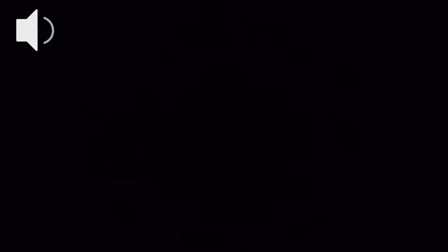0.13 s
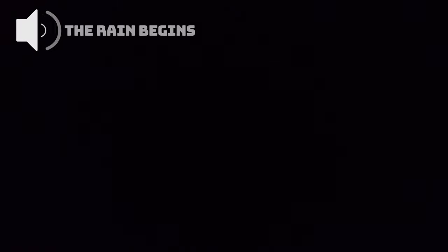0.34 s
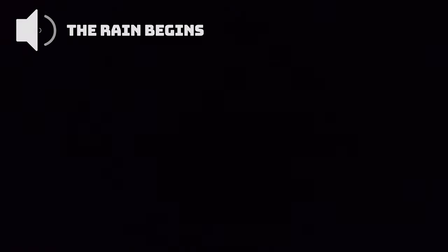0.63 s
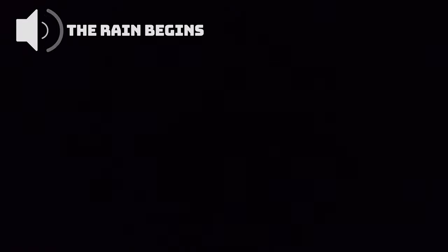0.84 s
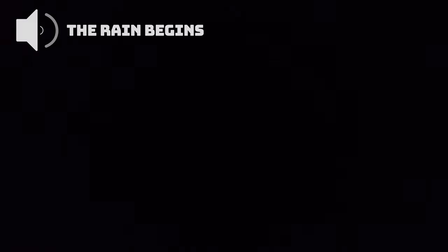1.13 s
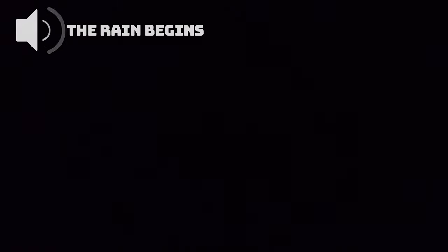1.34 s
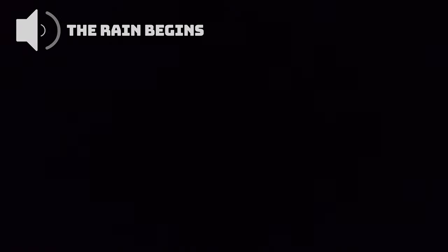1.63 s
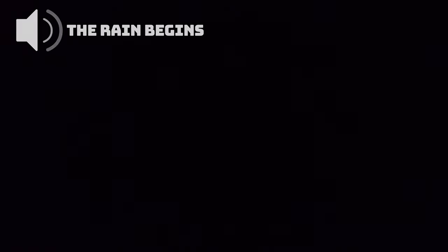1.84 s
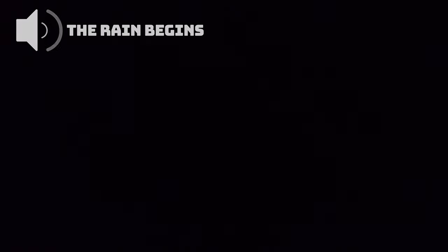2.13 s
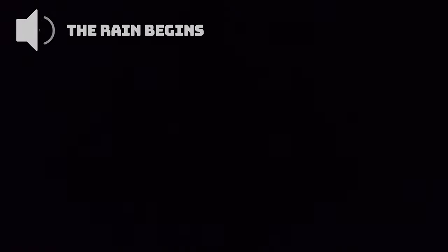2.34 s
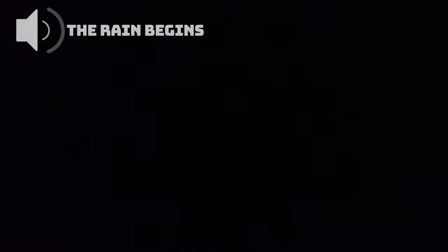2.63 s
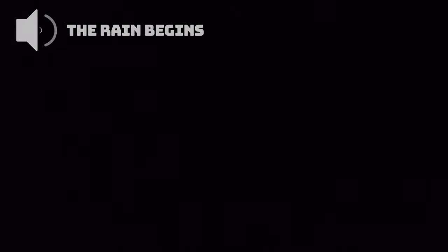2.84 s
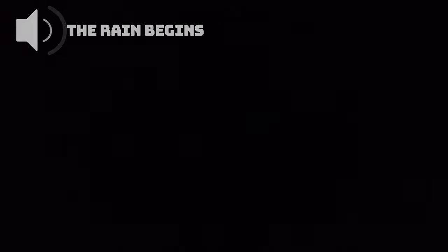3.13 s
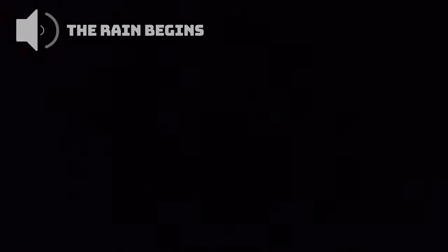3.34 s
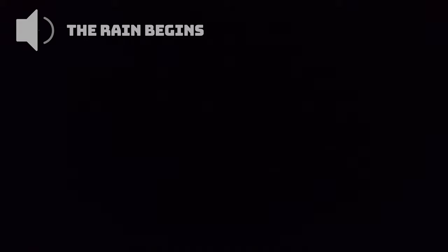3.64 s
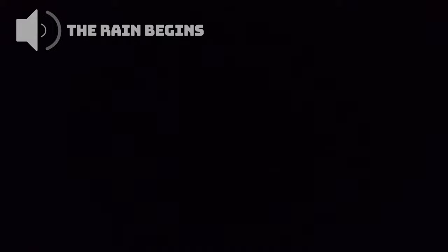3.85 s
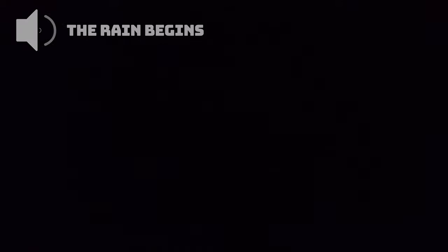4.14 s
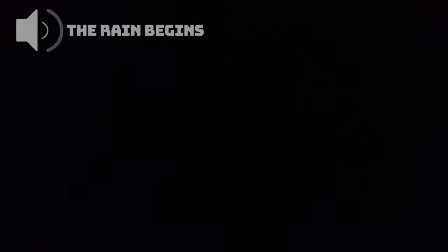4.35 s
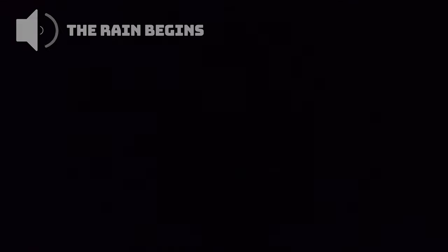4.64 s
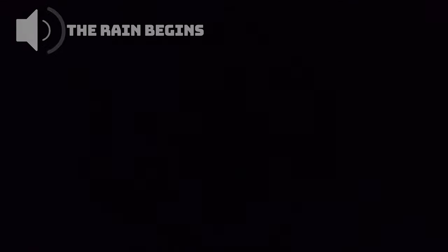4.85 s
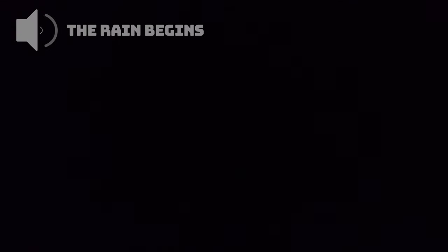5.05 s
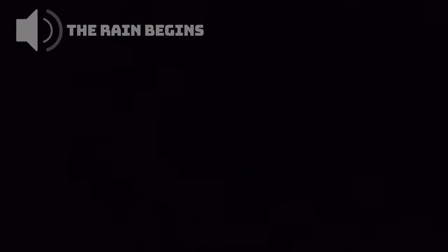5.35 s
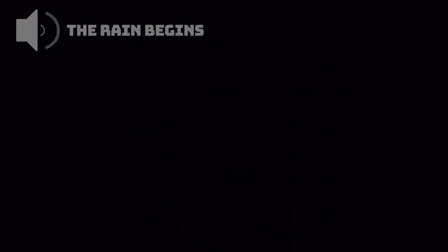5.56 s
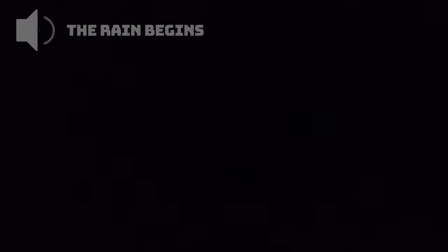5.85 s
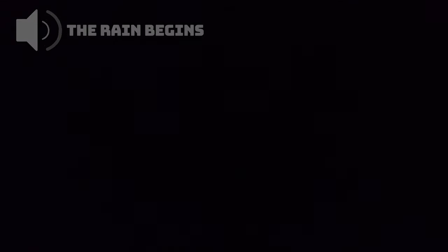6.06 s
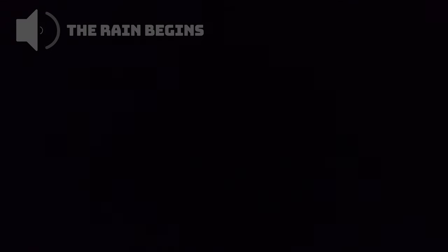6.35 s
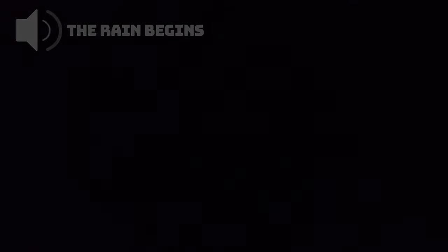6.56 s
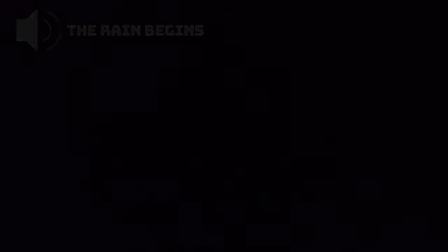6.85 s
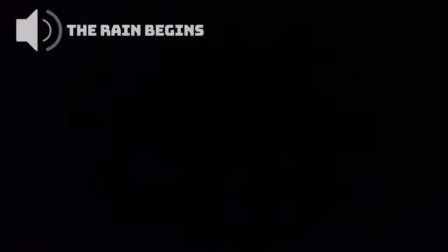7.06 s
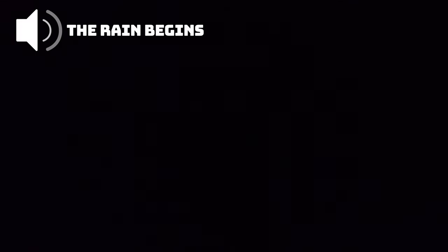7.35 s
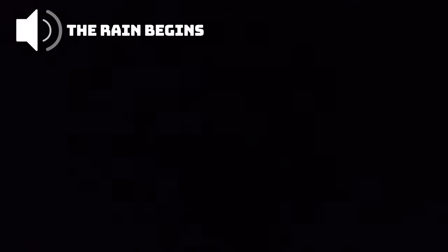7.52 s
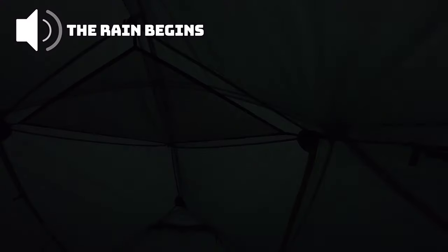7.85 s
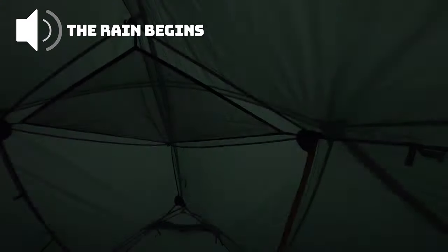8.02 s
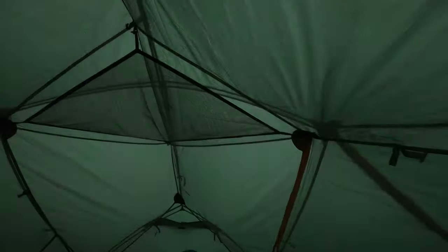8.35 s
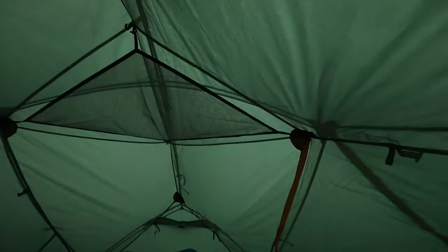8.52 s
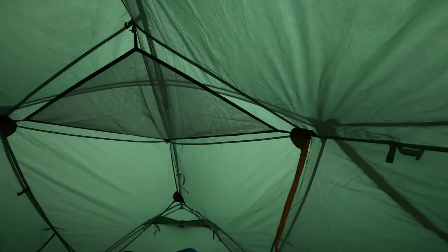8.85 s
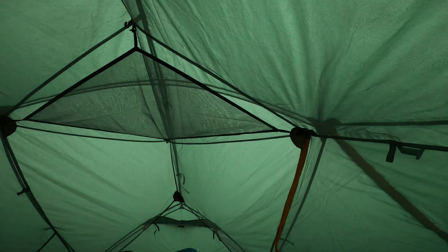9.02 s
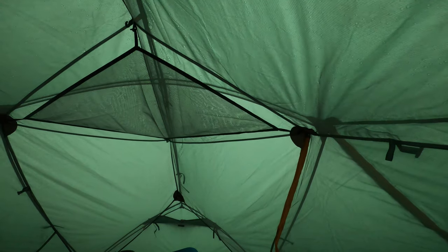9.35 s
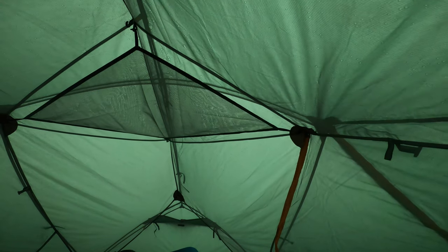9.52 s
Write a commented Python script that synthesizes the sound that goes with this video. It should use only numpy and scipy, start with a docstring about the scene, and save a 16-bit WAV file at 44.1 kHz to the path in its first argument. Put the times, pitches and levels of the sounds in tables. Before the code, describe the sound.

From 0 to about 7.8 s, light rain falls on a taut tent fly, heard close from inside in wide stereo. Hundreds of fine, dry ticks a second blend over a soft mid-to-high hiss, wandering gently in strength. Larger drops stand out irregularly, several each second, as crisp snaps or compact plops, notably near 0.7, 1.1, 2.4 and 3.7 s, with short cloth shiver and small, dry echoes. Underneath, panels murmur faintly, swelling near 5.2 and 5.9 s; a slack panel gives a dull low flap around 5.0 and 5.25 s. Brief low wind buffets bump near 0.4 and 1.4 s and cluster from 7.3 to 8.5 s. From 7.8 s heavy rain fades in quickly while the light rain fades out by about 9 s. It is louder, denser, duller and nearly mono: fat, round pats overhead over a low wash, surging until the end at about 9.7 s.

```python
"""Inside a tent in the rain, in two scenes. Fine drops tick on the taut fly all around; near eight seconds
this light-rain scene fades out while a heavier, duller, nearly mono rain scene fades in.
Each drop is a sharp push on the cloth with a brief shiver and echoes; crowds of drops and filtered
noise make the rain. The fabric drums softly (noise with moving resonances), a slack panel
flaps now and then (short low swings), and wind buffets the microphones (low noise in gusts)."""
import sys
import numpy as np
from scipy import signal
from scipy.fft import rfft, irfft, next_fast_len
from scipy.io import wavfile
from scipy.ndimage import uniform_filter1d

SR = 44100
rng = np.random.default_rng(int(sys.argv[2]) if len(sys.argv) > 2 else 0)


def int16_out(signal):
    """Quantize to a 16-bit WAV file."""
    q = np.round(np.clip(np.atleast_2d(signal).T, -1, 1) * 32767)
    wavfile.write(sys.argv[1], SR, q.astype(np.int16))


N = 426888
TIME = np.arange(N) / SR  # seconds
DROP_SIZE = 4096  # samples in one drop
EDGE_HZ = 15200  # top of the band that is heard
DROPLET_FLIGHT_S = .02  # longest flight of the droplets that a big drop throws up
BREEZE_DB = -70.5  # the breeze between gusts, on the same scale as the gusts
# the light-rain scene (rain and drumming) holds this gain, then fades out ever faster
SHOWER_GAIN_DB, SHOWER_ENDS_S, SHOWER_SINK_DB_PER_S2 = 5, 8.05, 32

# Levels in these tables are relative: the functions that use them may add a gain.
# strength of the light rain as it comes in waves: (time [s], level [dB])
LIGHT_RAIN_LEVEL = [(0, -51), (.1, -50), (.25, -53.5), (.6, -53), (.8, -54), (1.1, -54.5), (1.45, -54),
                    (1.78, -50.5), (2.1, -52), (2.55, -52), (2.75, -52.5), (3.45, -50.5), (3.6, -54.5),
                    (3.76, -49), (3.9, -54.5), (4.26, -53), (4.31, -57.5), (4.37, -59.5), (4.385, -53.5),
                    (4.5, -56.5), (4.7, -51), (4.85, -53), (4.96, -49.5), (5.08, -56), (5.14, -51),
                    (5.36, -50.5), (5.55, -55), (5.8, -52), (6.4, -50.5), (6.9, -53.5), (7.35, -51.5),
                    (7.6, -56.5), (7.8, -54.5)]
# the biggest drops in the light rain: (time [s], level of the first 3 ms [dB], pitch of the splat [Hz],
# prominence of that pitch [dB], its width [octaves], left minus right near 2500 Hz [dB])
BIG_LIGHT_DROPS = [(0.0098, -38, 3400, 13, 0.92, 0.5), (0.0881, -38.5, 1780.0, 7, 0.38, -2),
                   (0.2348, -41.5, 3200.0, 8, 0.32, 3), (0.5707, -43, 2900.0, 2, 0.93, 1),
                   (0.7115, -33.5, 1700, 13, 0.97, 0), (0.7323, -40, 3200.0, 9, 0.25, -1),
                   (0.7448, -43.5, 4440, 22, 0.65, 0), (1.1131, -31, 2180, 11, 0.5, -3.5),
                   (1.3473, -39.5, 7040, 4, 0.25, 2.5), (1.3716, -45, 3040.0, 10, 0.25, -4),
                   (1.451, -40.5, 4730.0, 11, 0.65, -0.5), (1.568, -40, 1390.0, 9, 0.54, -1),
                   (1.594, -38, 2900.0, 1, 0.25, 2), (1.633, -48, 4500.0, 5.5, 0.25, -3),
                   (1.6735, -43, 4470, 4, 0.71, 0), (1.699, -41, 2060.0, 9, 0.5, 1),
                   (1.7467, -37, 3530.0, 10, 0.5, 3), (1.7538, -40, 2900.0, 6, 0.25, -5),
                   (1.8623, -46, 2900.0, 7, 1, 3), (1.9029, -44, 3360.0, 3, 0.72, 1),
                   (1.9138, -41.0, 1380, 21, 0.85, -2), (1.9365, -42.5, 1960.0, 13, 0.28, -1),
                   (1.9468, -39, 1610.0, 7, 0.74, -2), (1.9992, -36.5, 2610, 11, 0.25, -1),
                   (2.0133, -42, 2500.0, 5, 0.85, 1), (2.049, -40.5, 1040.0, 5, 0.4, 0),
                   (2.1203, -41, 1190, 15, 0.79, -1), (2.269, -50, 2500.0, 9, 0.85, -4),
                   (2.282, -39, 2900.0, 4, 0.5, -1), (2.3828, -37, 2380.0, 7, 0.25, 0),
                   (2.409, -31, 5260, 14, 0.43, 2), (2.4721, -38.5, 2270.0, 3, 0.31, -2),
                   (2.5744, -41.5, 3700.0, 3, 0.25, -1), (2.5972, -40, 5800, 2, 0.25, -2),
                   (2.6506, -38.5, 2270.0, 4, 0.5, 0), (2.672, -39, 940.0, 5, 0.28, -1),
                   (2.6926, -39.0, 2720, 17, 0.39, 2), (2.761, -35.5, 5480.0, 3, 0.25, 0),
                   (2.7917, -41.5, 1040.0, 10, 0.83, 2), (2.8986, -41.0, 2510, 13, 0.65, -1),
                   (2.9279, -40.0, 3360.0, 12, 0.85, 11), (3.0972, -40.5, 2630.0, 11, 0.99, 0),
                   (3.1122, -39, 3040.0, 13, 0.94, 2), (3.1268, -39.5, 6350.0, 6, 0.83, -1),
                   (3.1537, -36, 3930, 18, 1, -1), (3.1953, -37.5, 3680, 12, 0.65, -3),
                   (3.2526, -44, 1080, 11, 0.85, -1), (3.2779, -43, 1320.0, 16, 0.81, 0),
                   (3.299, -45, 890.0, 13, 0.98, -4), (3.3114, -48, 1390.0, 8, 0.5, -2),
                   (3.3858, -34.0, 2600, 10, 0.25, 3), (3.6205, -41.0, 3020, 7, 0.25, -1),
                   (3.6857, -42.0, 3530.0, 15, 0.5, 2), (3.6934, -32, 2530, 9, 0.25, -4),
                   (3.715, -47, 4080.0, 16, 0.85, -4), (3.7588, -40, 1390.0, 6, 0.85, -2),
                   (3.7744, -37.5, 5170, 8, 0.39, -2), (3.8036, -41, 1320.0, 11, 0.65, 2),
                   (3.8778, -44, 4290.0, 0, 0.25, -2), (3.9814, -38, 1330, 4, 0.22, -2.5),
                   (4.0855, -39, 3360.0, 13, 0.94, -1), (4.1288, -42.5, 3890.0, 3, 1, 2),
                   (4.4368, -45, 810.0, 5, 0.65, 1), (4.5115, -39.5, 3200.0, 3, 0.22, -1),
                   (4.5589, -41, 6350.0, 2, 0.5, -1), (4.6254, -42.0, 890.0, 9, 0.72, -2),
                   (4.6637, -41, 760, 12, 0.65, -2), (4.6718, -33.5, 3200.0, 3, 0.85, -1),
                   (4.725, -40.5, 2370, 4, 0.25, -3), (4.9566, -37.5, 2500.0, 6, 0.2, -2),
                   (5.011, -39, 1530.0, 4, 0.5, 13), (5.1192, -42, 2900.0, 10, 0.85, -1),
                   (5.1335, -34, 4080.0, 5, 0.99, -2), (5.2341, -40.5, 5220.0, 3, 0.25, -3),
                   (5.2533, -46, 7000.0, 8, 0.5, 2), (5.3142, -36.0, 850.0, 1, 0.65, -3),
                   (5.3864, -37.5, 4730.0, 7, 0.75, -2), (5.4375, -41, 2630.0, 7, 0.25, 6),
                   (5.5086, -41, 4970.0, 13, 0.36, -1), (5.553, -37, 2060.0, 6, 0.27, -1),
                   (5.597, -42.5, 6040.0, 8, 0.25, -2), (5.6194, -38.5, 4970.0, 5, 1, -3),
                   (5.687, -44, 4060, 9, 0.33, -3), (5.7385, -41.5, 4080.0, 7, 0.25, 0),
                   (5.7432, -38, 3040.0, 4, 0.35, 2), (5.7521, -39, 4290.0, 1, 0.65, -1),
                   (5.7797, -41.5, 3040.0, 7, 0.25, 0), (5.8639, -43, 990.0, 8, 1, -4),
                   (5.8811, -45, 2270.0, 11, 0.25, 2), (5.9423, -41, 1780.0, 6, 0.35, 0),
                   (6.0074, -44.5, 1610.0, 12, 0.43, 2), (6.0404, -40.5, 4260, 14, 0.98, -5),
                   (6.1156, -36.5, 1530.0, 8, 0.45, 0), (6.2226, -42, 4730.0, 15, 0.65, -4),
                   (6.2826, -39, 1960.0, 7, 0.25, -4), (6.3385, -40.0, 2900.0, 16, 1, 0),
                   (6.3855, -36.5, 2900.0, 4, 0.21, -3), (6.4265, -42, 3890.0, 7, 0.25, 1),
                   (6.4574, -38, 1380, 10, 0.98, 5), (6.4678, -37, 4000, 9, 0.4, -2),
                   (6.811, -36.5, 4290.0, 7, 0.97, 3), (6.8212, -41.5, 1690.0, 11, 0.65, -7),
                   (6.9225, -45, 1960.0, 2, 0.25, 0), (7.081, -42.5, 1040.0, 13, 1, 0),
                   (7.1477, -40, 3000, 8, 0.25, 0), (7.272, -38, 1260.0, 10, 0.85, -2),
                   (7.3195, -36, 940.0, 6, 0.45, -2), (7.3336, -37.5, 1530.0, 8, 1, 0),
                   (7.3758, -42, 1860.0, 10, 0.93, -1), (7.3996, -38.5, 3700.0, 2, 0.25, -2.5),
                   (7.6523, -40, 2080, 7, 0.69, 1), (7.7382, -42.5, 2900.0, 7, 0.23, -3)]
# colour of the fly under fine drops: (frequency [Hz], level [dB])
FINE_DROP_COLOUR = [(60, -41), (200, -14), (420, -12), (600, -8.5), (880, -8.5), (1050, -1), (2000, 0.5),
                    (3200, -0.14), (4500, -6.5), (7400, -12.5), (8500, -19), (12300, -28.5), (14500, -54)]
# balance of the two microphones in the light rain: (frequency [Hz], left minus right [dB])
MICROPHONE_BALANCE = [(300, -5), (1200, -0.6), (2500, 0.9), (4100, 1.5), (6000, -3), (7600, -7),
                      (8700, -1.5), (14000, -2)]
# strength of the heavy rain as its scene fades in and the rain surges: (time [s], level [dB])
HEAVY_RAIN_LEVEL = [(7.78, -72), (7.88, -54), (7.97, -52), (8.06, -46), (8.17, -46), (8.24, -45),
                    (8.42, -42.5), (8.55, -44.5), (8.7, -41.5), (8.83, -46.5), (8.96, -43), (9.14, -45.5),
                    (9.24, -43.5), (9.35, -44.5), (9.48, -44), (9.68, -46.5)]
# the biggest drops in the heavy rain: (time [s], level of the first 3 ms [dB], pitch of the splat [Hz],
# prominence of that pitch [dB])
BIG_HEAVY_DROPS = [(8.0564, -37, 1090.0, 4), (8.1505, -43, 810.0, 11), (8.215, -34.5, 710, 8),
                   (8.2293, -35.5, 3380, 13), (8.2446, -36, 2630.0, 6), (8.2763, -37.5, 700.0, 2),
                   (8.3213, -42, 990.0, 9), (8.343, -43, 990.0, 6), (8.423, -33, 1320.0, 16),
                   (8.4424, -40, 1460.0, 6), (8.4885, -44, 2500.0, 4), (8.5273, -34.5, 3530.0, 4),
                   (8.5536, -36, 1180, 10), (8.5972, -37, 1200.0, 13), (8.6338, -37.5, 1390.0, 8),
                   (8.6577, -46, 2160.0, 13), (8.6845, -36.0, 1460.0, 12), (8.6967, -38, 700.0, 7),
                   (8.72, -41.0, 810.0, 15), (8.7593, -37, 1320.0, 14), (8.7957, -41.5, 1320.0, 8),
                   (8.8119, -40, 850.0, 13), (8.8678, -44, 700.0, 7), (8.883, -35.5, 3700.0, 7),
                   (8.9486, -35, 2150, 12), (8.9716, -37.5, 1960.0, 10), (8.9853, -36, 1040.0, 6),
                   (9.0116, -37, 3390, 6), (9.0295, -33, 700.0, 8), (9.0787, -35, 1040.0, 4),
                   (9.1101, -36.5, 990.0, -1), (9.1375, -37, 700.0, 2), (9.1657, -33.5, 700.0, 4),
                   (9.1806, -31.5, 940.0, 1), (9.1942, -38, 1140.0, 3), (9.209, -41, 850.0, -6),
                   (9.2365, -31, 1080, 8), (9.2628, -39.5, 5220.0, 9), (9.299, -38, 740.0, 13),
                   (9.4007, -38.5, 3200.0, 8), (9.4312, -40.5, 1460.0, 9), (9.4635, -33.5, 1390.0, 7),
                   (9.5007, -37, 820, 13), (9.5169, -39, 740.0, 2), (9.5627, -37, 704, 10),
                   (9.588, -40, 815, 13), (9.5995, -40, 1690.0, 3), (9.655, -43, 3040.0, 3)]
# colour of the fly under heavy drops: (frequency [Hz], level [dB])
HEAVY_DROP_COLOUR = [(30, -21), (100, -33.5), (160, -10.5), (330, -6), (520, -12), (800, -6), (1100, -2.7),
                     (1350, -3), (2200, -10.5), (3100, -9), (5000, -17.5), (8000, -25), (10000, -26),
                     (14500, -41)]
# drumming of the fabric: (time [s], lower resonances [dB], upper resonances [dB])
DRUMMING_LEVEL = [(0.0, -78, -81), (0.04, -72, -73), (0.46, -80, -80), (0.63, -71.5, -73.5),
                  (1.87, -64, -70), (1.93, -74.5, -71.5), (2.52, -74, -69.5), (2.78, -69, -74),
                  (3.13, -71, -76), (3.67, -70, -70), (4.17, -73.5, -71.5), (5.24, -62.5, -70),
                  (5.65, -72, -76), (5.84, -69, -67), (5.89, -62, -69.5), (6.6, -73, -75),
                  (6.69, -61.5, -75), (6.78, -71.5, -77), (7.49, -72, -74.5), (7.67, -86, -80),
                  (7.71, -73, -68), (7.8, -75, -74)]
# colour of the drumming: (frequency [Hz], level [dB])
DRUMMING_COLOUR = [(30, -6), (65, -10), (100, -20.5), (122, -17.5), (150, -0.5), (190, -3.5), (240, -3.5),
                   (320, -3.5), (430, -12), (800, -22.5), (3000, -73)]
# soft flaps of the slack fly: (time of the middle [s], peak [dB], pitch [Hz], half length [s])
SLACK_FLAPS = [(1.532, -62, 80, 0.012), (4.978, -52, 60, 0.0075), (5.251, -45, 46.3, 0.019),
               (5.245, -54, 105, 0.009), (6.94, -57, 120, 0.0044), (7.97, -46.5, 207, 0.0048)]
# gusts at the microphones: (time of the height [s], level [dB], half length [s])
WIND_GUSTS = [(.115, -61, 0.023), (0.283, -59, 0.03), (0.417, -49, 0.018), (.565, -54, 0.028),
              (.97, -62, 0.049), (1.439, -45, 0.031), (1.516, -60, 0.034), (1.728, -54, 0.036),
              (2.82, -50, 0.023), (2.905, -53, .03), (3.897, -53, 0.024), (4.85, -60.5, .22),
              (5.246, -54, 0.059), (5.52, -62.5, 0.18), (6.6, -67, .23), (7.275, -48, 0.058),
              (7.38, -43.5, 0.045), (7.512, -49, 0.069), (7.683, -44, 0.026), (7.762, -46, 0.05),
              (7.903, -48, 0.064), (8.078, -49, 0.08), (8.293, -44.5, 0.041), (8.363, -51, 0.03),
              (8.445, -50, 0.027)]
# colour of the wind: (frequency [Hz], level [dB])
BUFFET_COLOUR = [(8, 8), (22, 12), (48, -4), (66, -18), (100, -26), (250, -57), (1500, -90)]


def light_rain(low_hz=950, high_hz=7000, pan_spread_db=3, ticks_db=-3.5, hiss_db=-10.5, near_db=-0.36, droplet_db=-16):
    """Ticks from all over the fly above the hiss of rain farther off; big drops throw up droplets."""
    kinds = []
    for hz in np.geomspace(low_hz, high_hz, 160):
        pan_db = pan_spread_db * rng.standard_normal()
        focus, far = rng.random(2)
        kinds.append(unit(fine_drop(hz, pan_db, focus, far)))
    ticks = patter(kinds, per_s=370, spread_db=6.0, largest=1.0, window_s=0.1, spray_share=.2, spray_s=.009)
    hiss = from_db(hiss_db) * noise(FINE_DROP_COLOUR, alike=0.62, alike_hz=3630)
    strength = flurries(depth_db=0.41, rate_hz=3.2) * level(LIGHT_RAIN_LEVEL) * shower_fade()
    out = (from_db(ticks_db) * ticks + hiss) * strength
    for s, db, hz, splat_db, octaves, pan_db in BIG_LIGHT_DROPS:
        add(out, round(s * SR), from_db(db + near_db) * big_drop(db, hz, splat_db, octaves, pan_db))
        # two droplets land just after
        for flight, focus, far in rng.random((2, 3)):
            start = round((s + DROPLET_FLIGHT_S * flight) * SR)
            add(out, start, from_db(db + droplet_db) * fine_drop(hz, pan_db, focus, far))
    return balanced(out)


def fine_drop(hz, pan_db, focus, far):
    """A dry tick close by, with more ring and stronger echoes farther off; nearly a note if focused (both 0-1)."""
    lag_ms = .048 - .006 * pan_db
    return splat(FINE_DROP_COLOUR, hz, pan_db, lag_ms, splat_db=7.0 + 7.9 * focus, octaves=0.58 - 0.31 * focus,
                 slow_hz=7000, swing=0.71, ring_db=-8 + 5.0 * far, ring_t60=0.0068 + 0.0022 * far,
                 tent_db=-10 + 5.0 * far, tent_t60=0.054, alike_hz=3440)


def big_drop(db, hz, splat_db, octaves, pan_db, soft_from_db=-41, dull_per_db=.75, soft_above_hz=1800):
    """A compact plop close by; the bigger it is, the less it sounds well above its own pitch."""
    lag_ms = .052 - .004 * pan_db
    dull_db = dull_per_db * max(db - soft_from_db, 0)
    colour = softened(FINE_DROP_COLOUR, dull_db, soft_above_hz + 0.96 * hz)
    return splat(colour, hz, pan_db, lag_ms, splat_db, octaves, slow_hz=6000, swing=0.5,
                 ring_db=-11.5, ring_t60=.008, tent_db=-8.5, tent_t60=.07, alike_hz=3450)


def flurries(depth_db, rate_hz):
    """Rain falls in uneven flurries: a gain that wanders at random, about rate_hz times a second."""
    size = next_fast_len(N)
    relative_rate = np.fft.rfftfreq(size, 1 / SR) / rate_hz
    band = relative_rate * np.exp(-relative_rate ** 2 / 2)
    wander = irfft(rfft(rng.standard_normal(size)) * band, size)[:N]
    return from_db(depth_db * unit(np.tanh(unit(wander) / 2)))


def shower_fade():
    """Gain of the light-rain scene: steady, then fading out while the heavy-rain scene fades in."""
    late_s = np.maximum(TIME - SHOWER_ENDS_S, 0)
    return from_db(SHOWER_GAIN_DB - SHOWER_SINK_DB_PER_S2 * late_s ** 2)


def balanced(x):
    """The two microphones differ by frequency: the right hears more of the top treble."""
    size = next_fast_len(N)
    db = colour_at(MICROPHONE_BALANCE, np.fft.rfftfreq(size, 1 / SR))
    return irfft(rfft(x, size) * from_db([db / 2, -db / 2]), size)[:, :N]


def heavy_rain(low_hz=400, high_hz=7500, pats_db=0, wash_db=-9, near_db=-1.0):
    """Crowded pats, each kind of its own colour, over a low wash, the biggest standing out; nearly mono."""
    kinds = []
    for hz in np.geomspace(low_hz, high_hz, 80):
        splat_db = 5.0 + 6.5 * rng.random()
        kinds.append(heavy_drop(hz, splat_db, tent_db=-3.0, dull_db=6))
    pats = patter(kinds, per_s=500, spread_db=3.0, largest=0.88, window_s=0.091, spray_share=0.05, spray_s=0.0057)
    wash = from_db(wash_db) * noise(HEAVY_DROP_COLOUR, alike=1.0, alike_hz=19800)
    out = (from_db(pats_db) * pats + wash) * level(HEAVY_RAIN_LEVEL)
    for s, db, hz, splat_db in BIG_HEAVY_DROPS:
        add(out, round(s * SR), from_db(db + near_db) * heavy_drop(hz, splat_db, tent_db=-8.5, dull_db=10))
    has_begun = TIME > HEAVY_RAIN_LEVEL[0][0]
    return out * has_begun


def heavy_drop(hz, splat_db, tent_db, dull_db):
    """A fat drop overhead: a round, dull pat that swings more of the cloth."""
    colour = softened(HEAVY_DROP_COLOUR, dull_db, above_hz=4500)
    return splat(colour, hz, 0, 0, splat_db, octaves=0.37, slow_hz=3500, swing=0.99,
                 ring_db=-16.5, ring_t60=.009, tent_db=tent_db, tent_t60=.09, alike_hz=22600)


def patter(kinds, per_s, spread_db, largest, window_s, spray_share, spray_s):
    """Drops of log-normal size at random moments, some as spray; the energy per window is evened out."""
    count = int(per_s * N / SR)
    when, radius, angle, kind, chance, flight = rng.random((count, 6)).T
    # two even draws make one bell-curve draw
    normal = np.sqrt(-2 * np.log(1 - radius)) * np.cos(2 * np.pi * angle)
    sizes = from_db(spread_db * np.minimum(normal, largest))
    # spray lands a moment after the largest drop of its group of eight
    group = np.arange(count) // 8
    largest_first = np.lexsort((-normal, group))
    parent = largest_first[np.searchsorted(group, group)]
    is_spray = (chance < spray_share) & (parent != np.arange(count))
    spray_starts = when[parent] * N - np.log(1 - flight) * spray_s * SR
    starts = np.where(is_spray, spray_starts, when * N).astype(int) % N
    energy = uniform_filter1d(np.bincount(starts, sizes ** 2, N), int(window_s * SR))
    sizes = sizes / np.sqrt(energy[starts] + 1e-12)
    out = np.zeros((2, N))
    for start, size, k in zip(starts, sizes, (kind * len(kinds)).astype(int)):
        add(out, start, size * kinds[k])
    return unit(out)


def splat(colour, hz, pan_db, lag_ms, splat_db, octaves, slow_hz, swing, ring_db, ring_t60, tent_db, tent_t60, alike_hz):
    """One drop, rms 1 over its first 3 ms: a push on the fly, a shiver of the cloth, echoes between the walls."""
    t, f = np.arange(DROP_SIZE) / SR, np.fft.rfftfreq(DROP_SIZE, 1 / SR)
    # the contact time of the drop favours one broad band
    octaves_away = np.log2((f + 1) / hz)
    db = colour_at(colour, f) + splat_db * np.exp(-.5 * (octaves_away / octaves) ** 2)
    # causal (minimum phase): nothing sounds before the impact
    log_gain = np.log(from_db(np.concatenate([db, db[-2:0:-1]])))
    push = np.exp(np.conj(signal.hilbert(log_gain)))[:len(f)]
    # long waves cross the cloth a little slower
    push = push * (slow_hz - 1j * f) / (slow_hz + 1j * f)
    # the dent swings back and forth at the pitch of the splat
    spring = hz ** 2 - f ** 2 + 1j * f * hz / swing
    push = push * np.conj(spring) / spring
    # shiver and echoes are noise that fades by 60 dB in t60 seconds
    ring = unit(rng.standard_normal((2, DROP_SIZE)) * np.exp(-np.log(1000) * t / ring_t60))
    echoes = unit(rng.standard_normal((2, DROP_SIZE)) * np.exp(-np.log(1000) * t / tent_t60))
    left, other = rfft(from_db(ring_db) * ring + from_db(tent_db) * echoes) / np.sqrt(DROP_SIZE)
    # long waves reach both microphones alike
    same = 1 / (1 + (f / alike_hz) ** 2)
    right = same * left + np.sqrt(1 - same ** 2) * other
    pair = push * (1 + np.array([left, right]))
    # the place of the drop sets delay and balance; mostly the treble is shaded
    sides = np.array([[.5], [-.5]])
    delay_s = (.15 + sides * lag_ms) / 1000
    shade = from_db(sides * pan_db * 2 * f / (f + 2500))
    # short waves arrive out of step
    scatter = 1.36 * rng.standard_normal() * np.tanh((f / (1.78 * alike_hz)) ** 3)
    phase = sides * scatter - 2 * np.pi * f * delay_s
    wave = irfft(pair * shade * np.exp(1j * phase), DROP_SIZE)
    return wave / np.sqrt(np.mean(wave[:, t < .003] ** 2))


def softened(colour, dull_db, above_hz):
    """A drop that lands softly loses up to dull_db of treble, half of it at above_hz."""
    return [(f, db - dull_db / (1 + (above_hz / f) ** 4)) for f, db in colour]


def drumming(drum_db=0.0, balance_db=-2.5, patchy_db=3.0, low_hz=185, high_hz=265):
    """The tent panels murmur under the light rain, lower and upper resonances swelling separately."""
    murmur = noise(DRUMMING_COLOUR, alike=.2, alike_hz=900)
    hz, t, spectrum = signal.stft(murmur, SR, nperseg=2048)
    # random swells, smoothed over frequency and then over time
    swells = uniform_filter1d(rng.standard_normal(spectrum.shape[1:]), size=4, axis=0)
    swells = unit(uniform_filter1d(swells, size=9, axis=1))
    s, lower, upper = np.transpose(DRUMMING_LEVEL)
    upper_share = np.interp(hz, [low_hz, high_hz], [0, 1])[:, None]
    db = (1 - upper_share) * np.interp(t, s, lower) + upper_share * np.interp(t, s, upper) + patchy_db * swells
    sides = from_db([[balance_db / 2], [-balance_db / 2]])
    drummed = signal.istft(spectrum * from_db(db))[1][:, :N]
    return from_db(drum_db) * sides * drummed * shower_fade()


def flaps():
    """A slack panel swings briefly: a dull, low push."""
    out = np.zeros(N)
    for s, db, hz, half_s in SLACK_FLAPS:
        swell = np.exp(-((TIME - s) / half_s) ** 2)
        out += from_db(db) * swell * np.cos(2 * np.pi * hz * (TIME - s))
    return out


def wind(wind_db=-2, balance_db=-2.5):
    """Soft, lumpy buffets of air, a little stronger on the right; each gust swells and dies over the breeze."""
    sides = from_db([[balance_db / 2], [-balance_db / 2]])
    power = from_db(BREEZE_DB) ** 2
    for s, db, half_s in WIND_GUSTS:
        power = power + from_db(db) ** 2 * np.exp(-2 * ((TIME - s) / half_s) ** 2)
    return from_db(wind_db) * sides * noise(BUFFET_COLOUR, alike=0.96, alike_hz=42) * np.sqrt(power)


def noise(colour, alike, alike_hz):
    """Coloured stereo noise whose sides grow less alike above alike_hz (alike 0-1)."""
    size = next_fast_len(N)
    hz = np.fft.rfftfreq(size, 1 / SR)
    left, other = rfft(rng.standard_normal((2, size)))
    same = np.clip(alike, 0, 1) / (1 + (hz / alike_hz) ** 2)
    right = same * left + np.sqrt(1 - same ** 2) * other
    pair = np.array([left, right])
    return unit(irfft(pair * from_db(colour_at(colour, hz)), size)[:, :N])


def from_db(db):
    """Decibels to gain."""
    return 10 ** (np.asarray(db) / 20)


def unit(x):
    """Scales to an rms of one."""
    return x / np.sqrt(np.mean(x ** 2) + 1e-30)


def level(curve):
    """A curve of (time [s], level [dB]) as a gain for every sample."""
    return from_db(np.interp(TIME, *np.transpose(curve)))


def colour_at(points, hz):
    """Reads a spectrum in dB on a log-frequency axis."""
    f, db = np.transpose(points)
    return np.interp(np.log(hz + 1), np.log(f + 1), db)


def add(mix, start, sound):
    """Mixes a stereo sound in at a sample index, cut off at the end of the mix."""
    part = mix[:, start:start + sound.shape[1]]
    part += sound[:, :part.shape[1]]


def scene():
    """Everything heard inside the tent, both rain scenes included."""
    return light_rain() + heavy_rain() + drumming() + flaps() + wind()


def record(dry):
    """The recorder's band limit: a steep low-pass at EDGE_HZ."""
    low_pass = signal.firwin(511, EDGE_HZ, window=("kaiser", 9), fs=SR)
    return signal.oaconvolve(dry, low_pass[None], "same", axes=1)


dry = scene()
out = record(dry)
int16_out(out)
```